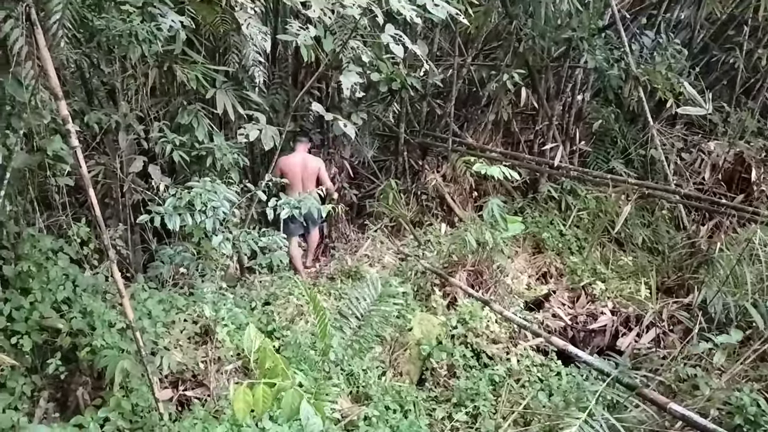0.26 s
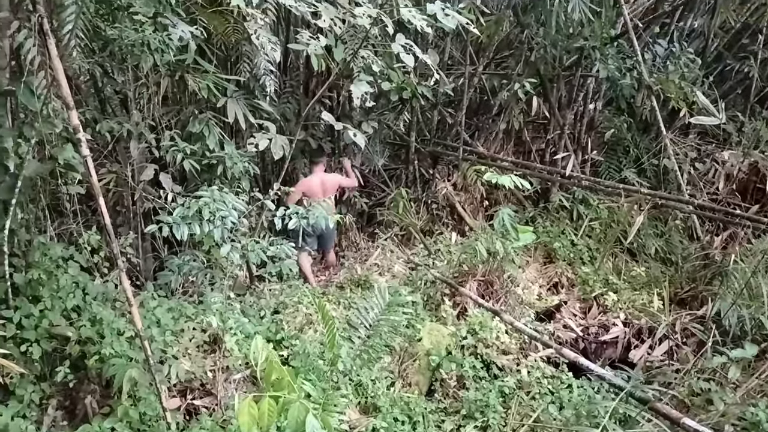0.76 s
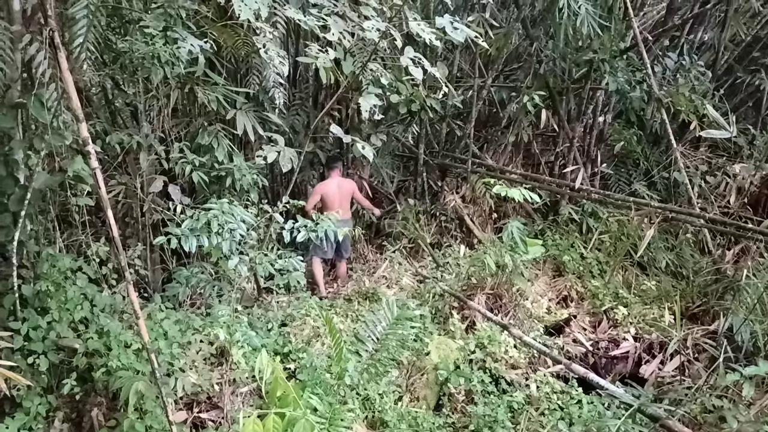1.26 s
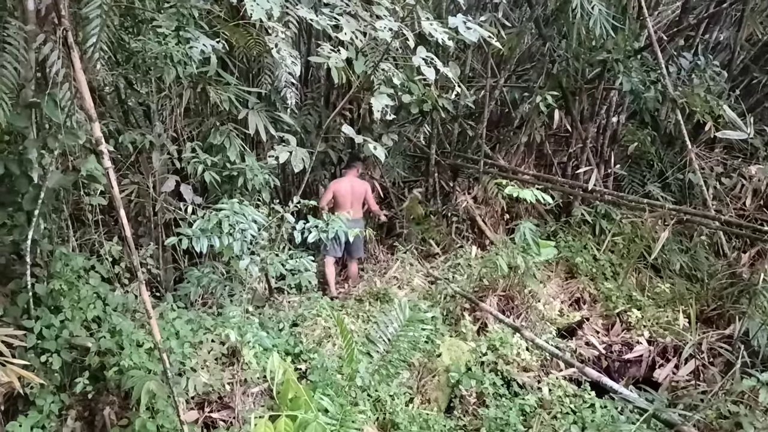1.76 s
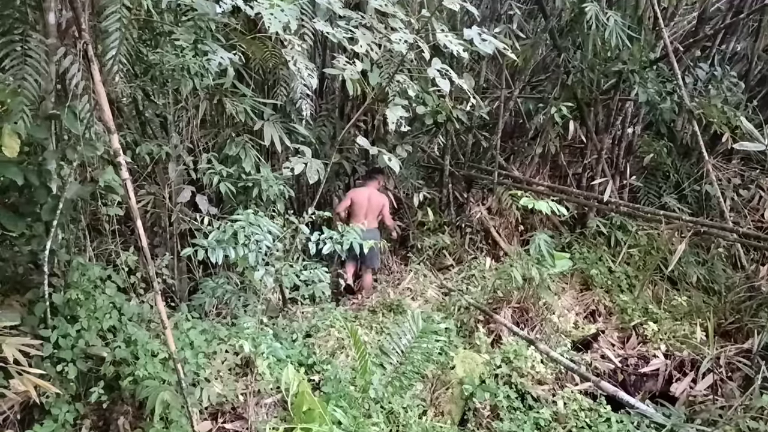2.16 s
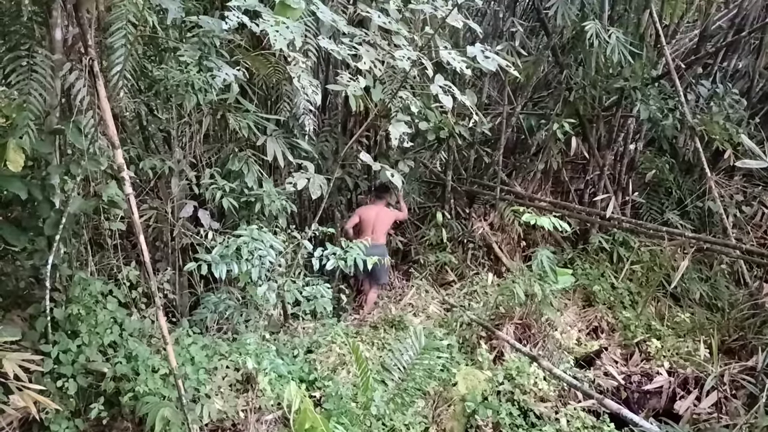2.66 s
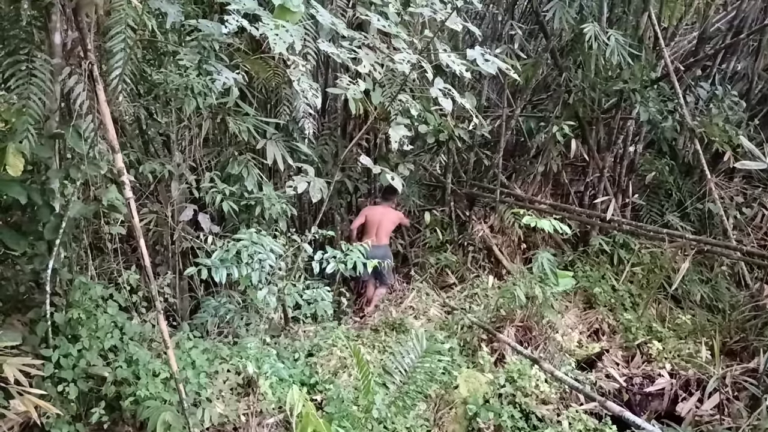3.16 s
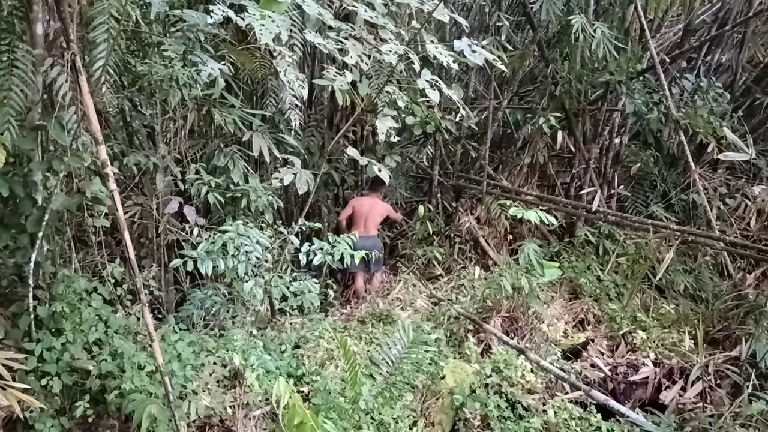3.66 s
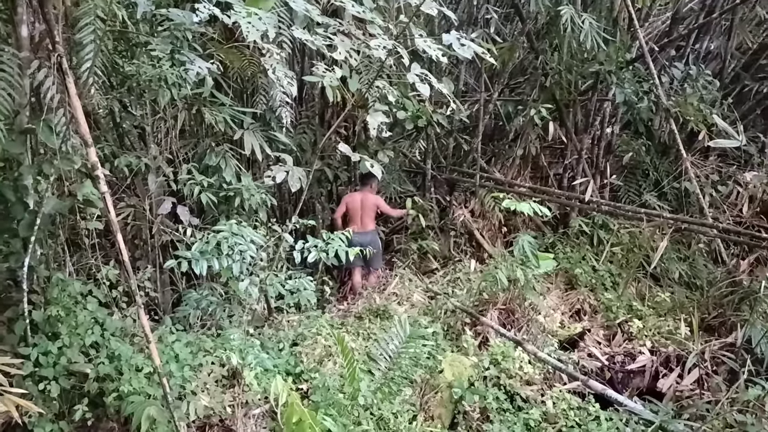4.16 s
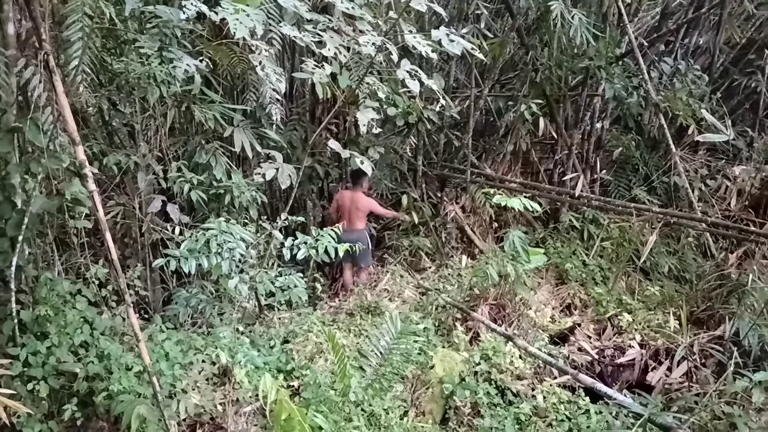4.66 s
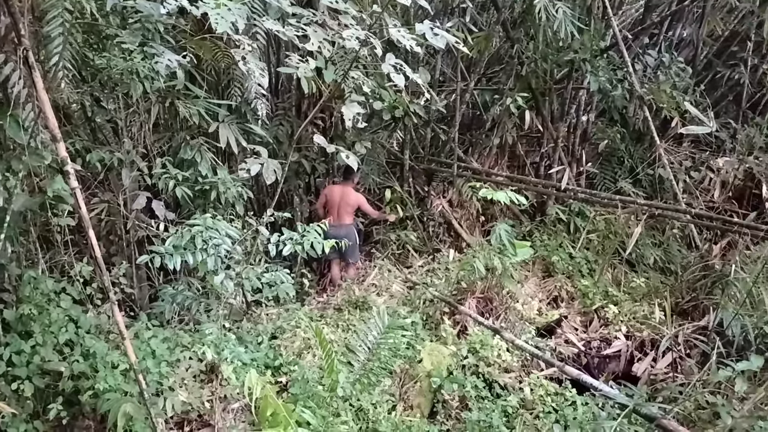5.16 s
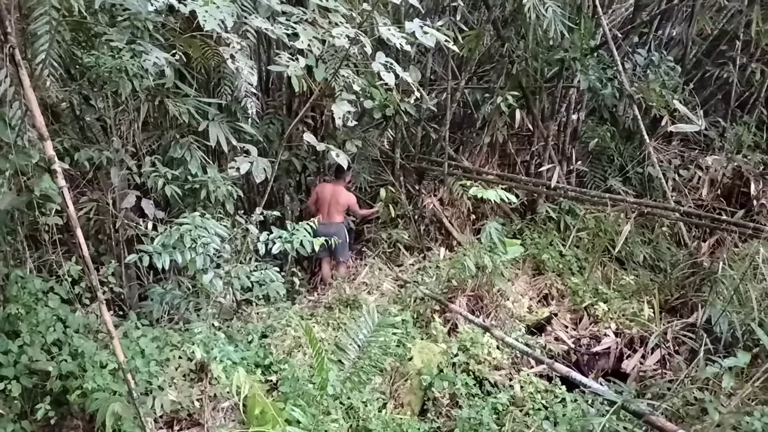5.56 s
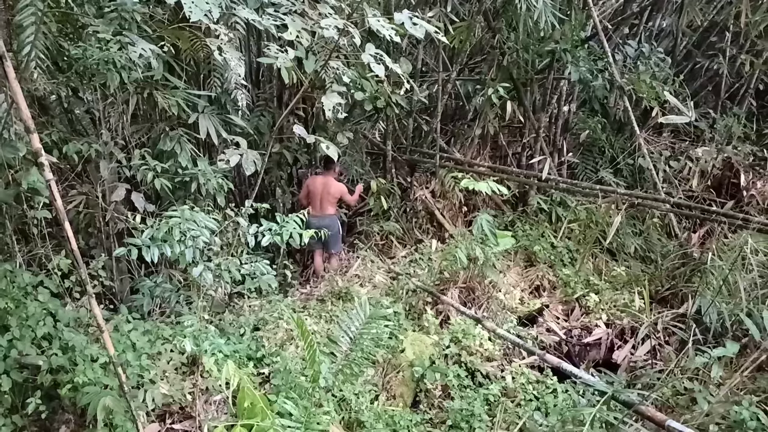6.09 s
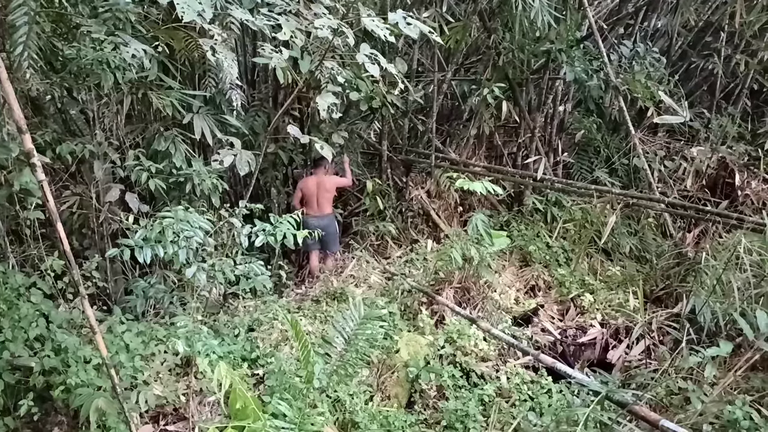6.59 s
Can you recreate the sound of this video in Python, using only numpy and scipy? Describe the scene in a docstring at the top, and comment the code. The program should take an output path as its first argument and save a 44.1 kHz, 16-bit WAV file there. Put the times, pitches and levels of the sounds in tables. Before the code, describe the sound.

In a forest thicket, cicadas hiss while a bird pipes falling notes; a blade cuts two bamboo stems, then a leafy cane is dragged and dropped.

```python
"""Cicadas hiss at left and right over soft forest air, and one bird repeats a falling phrase.
Some way off, at the edge of a bamboo thicket, a man cuts two stems with a long blade.
Each cut is a burst of tearing fibres (shaped noise) that rings the hollow stem (fading sines).
He drags a leafy cane aside (crackling noise) and lets it drop; two drops tap a leaf and another bird scolds.
Random echoes, different at each ear, scatter these sounds through the grove."""
import sys
import numpy as np
from scipy import signal
from scipy.fft import rfft, irfft
from scipy.io import wavfile
from scipy.ndimage import uniform_filter1d

SR = 44100
rng = np.random.default_rng(int(sys.argv[2]) if len(sys.argv) > 2 else 0)


def unload_wav(signal):
    """Save mono or channel-first audio to the path in sys.argv[1] as 16-bit WAV at rate SR, clipped to [-1, 1]."""
    wavfile.write(
        sys.argv[1],
        SR,
        np.round(np.clip(np.atleast_2d(signal).T, -1, 1) * 32767).astype(np.int16),
    )


N = 301203
TIME = np.arange(N) / SR
BIN_HZ = np.arange(N // 2 + 1) * SR / N   # frequencies of the full-length spectrum


def from_db(db):
    """Turn decibels into a plain factor."""
    return 10 ** (np.asarray(db) / 20)


def rms_one(x):
    """Scale a sound to an average (rms) strength of 1."""
    return x / np.sqrt(np.mean(x ** 2) + 1e-20)


def in_time(rows, t=TIME):
    """Draw straight lines through rows that start with a time in seconds."""
    s, *columns = np.transpose(rows)
    return [np.interp(t, s, c) for c in columns]


def at_hz(points, hz, axis=1):
    """Read a table at any frequency, with even steps in pitch between its points."""
    points = np.array(points)
    return np.interp(np.log(np.maximum(hz, 1)), np.log(points[:, 0]), points[:, axis])


def filtered(x, order, hz, kind):
    """Keep the lows, the highs or a band of a sound."""
    return signal.sosfilt(signal.butter(order, hz, kind, fs=SR, output="sos"), x)


def coloured(x, spectrum):
    """Give a steady noise a spectrum; rms 1."""
    gains = from_db(at_hz(spectrum, BIN_HZ))
    return rms_one(irfft(rfft(x) * gains, N))


def drift(rate):
    """Wander by chance between random points, `rate` of them a second; rms 1."""
    knots = rng.standard_normal(int(N / SR * rate) + 2)
    return rms_one(np.interp(TIME * rate, np.arange(len(knots)), knots))


def grains(spread_db):
    """Dense tiny fractures of very uneven size: noise whose level jumps every 10 samples."""
    sizes = np.repeat(rng.standard_normal(N // 10 + 1), 10)[:N]
    return rng.standard_normal(N) * from_db(spread_db * np.clip(sizes, -2, 2))


def scuff(hz, width):
    """Noise in one band of a given relative width; rms 1."""
    band_hz = [hz / (1 + width / 2), hz * (1 + width / 2)]
    return rms_one(filtered(rng.standard_normal(N), 2, band_hz, "band"))


def burst(s, decay, rise=0.0015):
    """Loudness that rises quickly and dies away exponentially; times in seconds."""
    age = np.maximum(TIME - s, 0)
    return (1 - np.exp(-age / rise)) * np.exp(-np.minimum(age / decay, 20))


def ring(x, hz, t60):
    """A unit click sets a sine of height 1 ringing; it falls 60 dB in t60 seconds."""
    shrink, turn = from_db(-60 / (t60 * SR)), 2 * np.pi * hz / SR
    return signal.lfilter([0, np.sin(turn)], [1, -2 * shrink * np.cos(turn), shrink * shrink], x + 1e-18)


def panned(x, left_db):
    """Make the left louder than the right by left_db, half of it on each side."""
    return x * from_db(np.array([[.5], [-.5]]) * left_db)


def add(out, s, sound):
    """Mix a short sound into a long one from second s on."""
    start = int(s * SR)
    out[start:start + len(sound)] += sound[:max(N - start, 0)]


# colour of the still air: [f/Hz, level/dB per Hz before scaling to rms 1]
AIR_COLOUR = [(20, -14), (60, -11), (90, 6.5), (115, 0), (200, 0.5), (400, -5.5), (900, -8), (2200, -4.5),
              (3300, -8.5), (5000, -8), (10000, -10.5), (15500, -8.5)]
# how alike the air is at the two ears: [f/Hz, left-right correlation]
EAR_LIKENESS = [(60, 0.64), (300, .75), (700, .65), (1400, 0), (3100, 0), (7000, 0.022)]
AIR_DB, AIR_WAVER_DB, AIR_WAVERS_PER_S = -70.5, 0.78, 1   # middle level, its wavering and how often


def air():
    """Soft forest background: noise mostly alike at both ears in the bass, separate higher up."""
    alike = np.clip(at_hz(EAR_LIKENESS, BIN_HZ), -1, 1)
    shared, opposed = rfft(rng.standard_normal((2, N)))
    both = irfft(np.sqrt(1 + alike) * shared + np.sqrt(1 - alike) * opposed * [[1], [-1]], N)
    return from_db(AIR_DB + AIR_WAVER_DB * drift(AIR_WAVERS_PER_S)) * coloured(both, AIR_COLOUR)


# colours of the cicada hiss: a band louder at the left, one louder at the right, and a lower one:
# [f/Hz, level/dB per Hz before scaling to rms 1]
HISS_LOUDER_LEFT = [(5500, -43), (6700, -21), (7000, -10), (7450, 1), (7800, -2.5), (8030, -10.5),
                    (8200, -2), (8380, -29), (8900, -31), (10000, -46.5), (13500, -46), (15000, -30.5),
                    (16000, -36.5)]
HISS_LOUDER_RIGHT = [(5000, -45.5), (5550, -26), (5850, -7.5), (6300, 2.5), (6600, -3), (7000, -4),
                     (7500, -20.5), (8200, -29), (9000, -48.5)]
LOW_HISS = [(4800, -58.5), (5200, -26), (5400, -5.5), (5570, 6), (5800, -4.5), (6200, -22.5), (6800, -48)]


def cicadas(spectrum, db, left_db, throb_db):
    """Many tymbals (the insects' drum skins) merge into a narrow hiss that throbs a little."""
    hiss = coloured(rng.standard_normal((2, N)), spectrum)
    return panned(hiss, left_db) * from_db(db + throb_db * drift(25))


def bird_note(shape, top_hz, rough):
    """Phase and loudness of one slurred note with a trembling pitch."""
    t = TIME[:int(shape[-1][0] * SR)]
    share, db = in_time(shape, t)
    tremble = rms_one(uniform_filter1d(rng.standard_normal(len(t)), size=60))
    hz = top_hz * share * (1 + rough * tremble)
    return 2 * np.pi * np.cumsum(hz) / SR, from_db(db)


def pipe_note(contour, top_hz):
    """One quick falling note, no two of quite the same length or contour."""
    shape = np.array(contour) * [rng.uniform(.85, 1.15), 1, 1]
    # the voice is least steady in the faint end of the note
    shape[-3:, 2] += rng.normal(0, 3.5, 3)
    phase, loudness = bird_note(shape, top_hz, rough=.022)
    return loudness * np.sin(phase)


# piping bird, one row a phrase; levels before the mix:
# [t/s, level/dB, top f/Hz, beat/s, extra level of the opening pair/dB, number of pairs]
PIPING_PHRASES = [(.190, -52, 2680, .125, -14.5, 3), (.874, -45.5, 2683, 0.12, -1.5, 3),
                  (1.585, -44.5, 2702, 0.12, 2, 3), (2.309, -49.5, 2693, .128, 4.5, 2),
                  (3.048, -41.5, 2700, 0.13, -3, 2), (3.766, -41, 2676, 0.13, -0.5, 2),
                  (4.498, -48, 2688, .131, 2, 2), (5.272, -46.5, 2700, .130, 6, 2),
                  (6.019, -51, 2625, 0.15, 0.5, 2)]
# notes come in pairs, the third pair far softer: [t/beats, first level/dB, second level/dB]
NOTE_PAIRS = [(0, -5, -1), (1, -0.5, -10.5), (2.44, -19, -20.5)]
# one short pip, before chance varies it: [t/s, share of top pitch, level/dB]
PIP = [(0, .98, -30), (.005, .955, -4), (.010, .945, 0), (.015, .905, -6), (.020, .76, -26),
       (.029, .6, -22), (.041, .58, -33)]
# the slur that closes a later pair, before chance varies it: [t/s, share of top pitch, level/dB]
CLOSING_SLUR = [(0, .92, -25), (.007, .88, 0), (.014, .81, -3), (.022, .72, -3), (.032, .645, -6),
                (.045, .62, -25)]
NOTE_GAP_S = .047   # from the first note of a pair to the second


def piping_bird():
    """About every three quarters of a second: pip-pip, pip-slur, at first with a soft pip-slur after."""
    out = np.zeros(N)
    for start, db, top_hz, beat, opening_db, count in PIPING_PHRASES:
        for k, (beats, first_db, second_db) in enumerate(NOTE_PAIRS[:round(count)]):
            s = start + beats * beat
            pair_db, closing = (db + opening_db, PIP) if k == 0 else (db, CLOSING_SLUR)
            add(out, s, from_db(pair_db + first_db) * pipe_note(PIP, top_hz))
            add(out, s + NOTE_GAP_S, from_db(pair_db + second_db) * pipe_note(closing, top_hz))
    return out


# blade splitting a stem, levels before the mix:
# [t/s, ring level/dB, crack level/dB, tearing time/s, brightness limit f/Hz]
THICK_STEPS = [(1.3462, -29, -19.5, 0.011, 7060), (1.3540, -21.5, -22.5, 0.0096, 13800),
               (1.3590, -32, -24, 0.0011, 12000), (1.3655, -31, -36.5, 0.025, 10140)]
THIN_STEPS = [(3.0980, -33, -25, 0.016, 10340), (3.1102, -47, -37, 0.0084, 12000)]
# notes of each hollow stem: [f/Hz, level/dB relative to the step's ring]
THICK_MODES = [(285, -15), (350, -11.5), (440, -10), (535, -6), (625, -7.5), (730, -8.5), (1185, -2),
               (1265, -0.5), (1720, 3), (1910, -2.5), (2190, 0), (2310, -0.5), (2400, 0.5), (2750, -10.5),
               (2910, -1.5), (3025, -10.5)]
THIN_MODES = [(620, -6), (705, -13.5), (1180, 3.5), (1310, -9), (1560, 5.5), (1975, -20), (2120, 6),
              (2260, 11), (2350, 3), (3060, -13), (3890, -3.5), (4080, -9)]
# colour of the tearing fibres: [f/Hz, level/dB per Hz before scaling to rms 1]
THICK_FIBRES = [(150, -35), (300, -7.5), (650, -11.5), (870, -24.5), (1200, -6.5), (2900, -2), (3500, -5),
                (4800, -8), (6300, -0.5), (7600, -5), (8500, -3.5), (10500, -8), (12000, -7),
                (15500, -14.5)]
THIN_FIBRES = [(150, -38), (450, -39), (650, 1), (900, -11.5), (1300, 3.5), (2300, 0), (3200, -1),
               (4600, 2), (5300, 4), (6700, 4.5), (8200, 0.5), (10500, -2.5), (12000, -5), (15500, -5)]
STEM_T60_S = .062   # time for a stem's ring to fall 60 dB


def chop(cut, stem, crack_colour, grain_db, lowest_hz, spread_db):
    """The blade breaks through in steps; each tears fibres and rings the hollow stem."""
    middle, side = (coloured(grains(grain_db), crack_colour) for _ in range(2))
    # nearby stems throw the treble to the two ears differently
    side = filtered(side, 2, 2200, "high")
    fibres = middle + from_db(spread_db) * side * [[1], [-1]]
    crack, ringing = 0, np.zeros(N)
    for s, ring_db, crack_db, tearing, bright_hz in cut:
        dulled = filtered(fibres, 2, min(bright_hz, .45 * SR), "low")
        crack = crack + from_db(crack_db) * dulled * burst(s, tearing, rise=0.00092)
        for hz, mode_db in stem:
            mode = ring(signal.unit_impulse(SR // 2), hz, STEM_T60_S)
            # each strip of the wall lets go at its own moment
            add(ringing, s + rng.uniform(0, .003), from_db(ring_db + mode_db) * mode / 2)
    # a narrow stem radiates no bass
    return filtered(crack + 1e-18, 6, lowest_hz, "high"), filtered(ringing + 1e-18, 6, lowest_hz, "high")


# the edge biting into the hard skin: [f/Hz, level/dB relative to the bite, time to fall 60 dB/s]
BITE_MODES = [(2030, -7.5, 0.0084), (2930, -0.5, 0.03), (3750, -7.5, 0.022), (6200, -7.5, .014),
              (7240, -3.5, 0.026)]


def bite(s, db, lowest_hz=1200):
    """First contact of the steel: a bright tick of short rings, choked at once by the wood."""
    out = np.zeros(N)
    for hz, mode_db, t60 in BITE_MODES:
        add(out, s, from_db(db + mode_db) * ring(signal.unit_impulse(SR // 4), hz, t60))
    return filtered(out + 1e-18, 3, lowest_hz, "high")


# a cane bumping and scuffing its neighbours, levels before the mix:
# [t/s, level/dB, decay/s, centre f/Hz, relative width]
CANE_BUMPS = [(1.471, -52.5, 0.023, 920, 3), (1.603, -57, 0.029, 1196, 0.25), (1.661, -53, 0.02, 4470, .45),
              (1.874, -65.5, 0.037, 635, 0.1), (1.913, -62, .026, 626, 0.095),
              (2.13, -73.5, .031, 646, 0.16), (3.302, -49.5, 0.0081, 1236, 0.13),
              (4.176, -61, 0.038, 1358, 0.74), (4.21, -58.5, 0.013, 684, 0.13),
              (4.455, -50, 0.009, 1110, 0.12), (4.529, -60.5, 0.013, 750, 0.48),
              (5.953, -53, 0.0095, 1230, 1.3)]


def bumps():
    """Dull, scuffing contacts of a cane, each a short burst of noise in one band."""
    out = 0
    for s, db, decay, hz, width in CANE_BUMPS:
        out = out + from_db(db) * scuff(hz, width) * burst(s, decay, rise=0.003)
    return out


# tugs that drag leaves through the thicket, before jerks and mix: [peak t/s, level/dB, swell/s, settle/s]
LEAF_TUGS = [(1.64, -61, .09, 0.2), (4.324, -47.5, 0.064, 0.12), (4.444, -48.5, 0.024, 0.012),
             (4.93, -60.5, 0.11, 0.073), (5.64, -49, 0.016, .01), (5.885, -62.5, 0.063, 0.35)]
# foliage keeps stirring around the long pull, before jerks and mix: [t/s, level/dB]
STIRRING = [(0, -87), (3.4, -87), (4.1, -69), (5.2, -90), (6.8, -110)]
JERK_DB, JERKS_PER_S = 1.5, 55   # leaves catch and slip


def dragging():
    """Loudness of the dragged leaves: each tug swells and settles, in small jerks."""
    strength = from_db(in_time(STIRRING)[0])
    for s, db, swell, settle in LEAF_TUGS:
        away = np.maximum((s - TIME) / swell, (TIME - s) / settle)
        strength = strength + from_db(db) * np.exp(-away)
    return strength * from_db(JERK_DB * drift(JERKS_PER_S))


# colour that shapes the leaf crackle: [f/Hz, level/dB]
RUSTLE_COLOUR = [(150, -26.5), (650, -2.5), (850, -16), (1150, 0), (2300, 2.5), (4000, -3.5), (6800, 7.5),
                 (10000, -5), (15500, -18)]


def leaves():
    """Clumps of crackle, band by band, as leaves of different sizes slide over each other."""
    out = 0
    edges = np.geomspace(150, 16000, 19)
    for low, high in zip(edges, edges[1:]):
        band = filtered(grains(7.5), 2, [low, high], "band")
        out = out + band * from_db(4.5 * np.minimum(drift(120), 1.8))
    return dragging() * coloured(out, RUSTLE_COLOUR)


# drops on a leaf, levels before the mix: [t/s, peak level/dB, f/Hz, swell time/s, flutter level/dB]
LEAF_DROPS = [(2.9236, -32, 1187, 0.00053, -49.5), (6.7067, -44, 1356, 0.00042, -50.5)]
FLUTTER_S = 0.0076   # decay time of the struck leaf's shiver


def drops():
    """A soft tap: the leaf swings for a few cycles and shivers on."""
    out = 0
    for s, db, hz, swell, flutter_db in LEAF_DROPS:
        age = np.clip(TIME - s, 0, swell * 60)
        shape = (age / swell / 3) ** 3 * np.exp(3 - age / swell)   # peaks at 1 after three swell times
        flutter = from_db(flutter_db) * scuff(hz, width=0.55) * burst(s, FLUTTER_S)
        out = out + from_db(db) * shape * np.sin(2 * np.pi * hz * age) + flutter
    return out


# dry twigs breaking, levels before the mix: [t/s, level/dB, tearing time/s]
TWIG_SNAPS = [(4.439, -55, 0.0032), (4.451, -47.5, 0.025), (4.929, -47, 0.0045), (5.638, -26, 0.0025),
              (5.641, -40, 0.017), (5.868, -55.5, 0.049)]
# colour of the snaps: [f/Hz, level/dB per Hz before scaling to rms 1]
TWIG_COLOUR = [(200, -29), (1400, -20), (1900, -3.5), (2500, 8.5), (3500, -2), (5000, -14), (7000, 0.5),
               (9500, -13), (15000, -68)]


def twigs():
    """Short dry fractures: quick bursts of grainy noise."""
    fibres = coloured(grains(2.0), TWIG_COLOUR)
    return fibres * sum(from_db(db) * burst(s, tearing, rise=0.00072) for s, db, tearing in TWIG_SNAPS)


# scolding bird, levels before rattle and mix: [t/s, level/dB, top f/Hz, upper voice level/dB to the lower]
SCOLDING_CALLS = [(4.733, -41.5, 2323, -43), (4.917, -45.5, 2261, -13), (5.087, -44, 2391, -20.5),
                  (5.256, -42, 2445, -27), (5.405, -43, 2390, -14), (5.571, -48.5, 2330, -9.5),
                  (5.860, -53.5, 2320, -22)]
# course of one scold: [t/s, share of top pitch, level/dB]
SCOLD_SHAPE = [(0, .9, -7), (.012, 0.9, -3), (.028, 0.97, 5.5), (.041, .87, -3), (.053, .79, 3.5),
               (.068, .77, -26), (.085, 0.74, -48)]


def scolding_bird(upper_ratio=1.32, rattle_hz=170):
    """Hoarse, rattling calls that fall in two voices, one from each side of the syrinx (voice organ)."""
    out = np.zeros(N)
    for s, db, top_hz, upper_db in SCOLDING_CALLS:
        phase, loudness = bird_note(SCOLD_SHAPE, top_hz, rough=.03)
        voices = np.sin(phase) + from_db(upper_db) * np.sin(upper_ratio * phase)
        add(out, s, from_db(db) * loudness * voices)
    # the airflow pulses unevenly, which roughens the call
    rattle = np.sin(2 * np.pi * np.cumsum(rattle_hz * (1 + 0.4 * drift(40))) / SR)
    return out * (1 + 0.3 * rattle)


# a cane lands on the ground and bounces, levels before the mix: [t/s, level/dB, decay/s, brightness limit f/Hz]
CANE_LANDING = [(4.888, -41, 0.022, 1000), (4.909, -42.5, 0.0095, 1200), (4.929, -38.5, 0.0034, 3000)]
# resonances of its thud: [f/Hz, width/Hz, level/dB before scaling to rms 1]
THUD_BANDS = [(269, 130, -0.5), (510, 94, -2), (790, 200, 1.5), (1000, 150, -3.5), (1200, 210, -0.5)]


def landing(rise_s=0.0027):
    """Each contact with the ground stirs the same damped resonances, with its own brightness."""
    body = rms_one(sum(from_db(db) * scuff(hz, width_hz / hz) for hz, width_hz, db in THUD_BANDS))
    out = 0
    for s, db, decay, bright_hz in CANE_LANDING:
        out = out + from_db(db) * filtered(body, 2, bright_hz, "low") * burst(s, decay, rise_s)
    return out


# scatter from stems and leaves: [f/Hz, level/dB before the far return, time to fall 60 dB/s]
GROVE_SCATTER = [(200, -19, .15), (512, -12.5, 0.13), (980, -8.5, 0.36), (1850, -1, .26), (3950, -5, .3),
                 (7000, 3.5, 0.36), (10500, -4, 0.34), (14930, 0.5, 0.21)]


def grove(x, far_db=-31, far_t60=1.6, build_s=0.0018):
    """Countless small echoes, different at each ear, and a faint long return from the hillside."""
    t, response = TIME[:SR], 0
    edges = np.geomspace(150, 17000, 14)
    for low, high in zip(edges, edges[1:]):
        hz = np.sqrt(low * high)
        echoes = filtered(rng.standard_normal((2, SR)), 2, [low, high], "band")
        near = np.exp(-np.log(1000) * t / at_hz(GROVE_SCATTER, hz, axis=2))
        far = from_db(far_db) * np.exp(-np.log(1000) * t / far_t60) / 2
        echoes = echoes * np.hypot(near, far) * (1 - np.exp(-t / build_s))
        # give each band energy in proportion to its width
        share = np.sqrt(2 * (high - low) / SR / np.sum(echoes ** 2, axis=1, keepdims=True))
        response = response + echoes * share * from_db(at_hz(GROVE_SCATTER, hz))
    return signal.fftconvolve(x[None], response, axes=1)[:, :N]


# the two microphones hear the treble differently: [f/Hz, left minus right level/dB]
MICROPHONE_BALANCE = [(2800, 0.5), (4200, -2), (5200, -6.5), (6600, -5.5), (7200, 5), (7800, 10.5),
                      (9300, 9.5), (11500, 3.5), (14500, 4), (15800, 9)]


def two_microphones(x):
    """Weigh each frequency between left and right; the two gains keep the same average power."""
    gains = panned(1, at_hz(MICROPHONE_BALANCE, BIN_HZ))
    return irfft(rfft(x) * gains / np.sqrt(np.mean(gains ** 2, axis=0)), N)


def scene():
    """Mix the direct and scattered sounds with the cicadas and the air."""
    thick_crack, thick_ring = chop(THICK_STEPS, THICK_MODES, THICK_FIBRES,
                                   grain_db=3.0, lowest_hz=254, spread_db=-1.0)
    thin_crack, thin_ring = chop(THIN_STEPS, THIN_MODES, THIN_FIBRES,
                                 grain_db=0.0, lowest_hz=560, spread_db=-2.0)
    thick_crack = thick_crack + bite(1.3471, db=-19.0)
    snaps, knocks, taps, rustle = twigs(), bumps() + landing(), drops(), leaves()
    piping, scolding = piping_bird(), scolding_bird()

    direct = thick_crack + thick_ring + knocks + taps + from_db(-2.0) * rustle
    direct = direct + panned(thin_crack + thin_ring + from_db(-1) * piping, -1.4)
    direct = direct + panned(snaps, -6.5) + from_db(-6.5) * panned(scolding, -6)

    # hidden, distant sources arrive mostly as scatter
    cutting = np.mean(from_db(-0.9) * thick_crack + from_db(1) * thin_crack, axis=0)
    cutting = cutting + from_db(-5.0) * (thick_ring + thin_ring)
    handling = from_db(-15.5) * snaps + from_db(-4.5) * knocks + from_db(-14) * taps + from_db(0.5) * rustle
    scattered = panned(grove(cutting), -0.28)
    scattered = scattered + panned(grove(handling + from_db(1.0) * piping), -1.1)
    scattered = scattered + from_db(2.0) * panned(grove(scolding), -2.4)

    # the low hiss falls silent: [t/s, level/dB]
    stopping, = in_time([(.48, -4), (.58, -42)])
    drone = cicadas(HISS_LOUDER_LEFT, db=-60.0, left_db=21.0, throb_db=0.28)
    drone = drone + cicadas(HISS_LOUDER_RIGHT, db=-60.0, left_db=-10.5, throb_db=1.1)
    drone = drone + cicadas(LOW_HISS, db=-62.0, left_db=-12.0, throb_db=4.0) * from_db(stopping)
    return two_microphones(direct + scattered) + drone + air()


CUTOFF_HZ = 15800


def record(dry):
    """Cut the top steeply above CUTOFF_HZ."""
    return signal.sosfilt(signal.ellip(10, .1, 80, CUTOFF_HZ, fs=SR, output="sos"), dry)


dry = scene()
out = record(dry)
unload_wav(out)
```